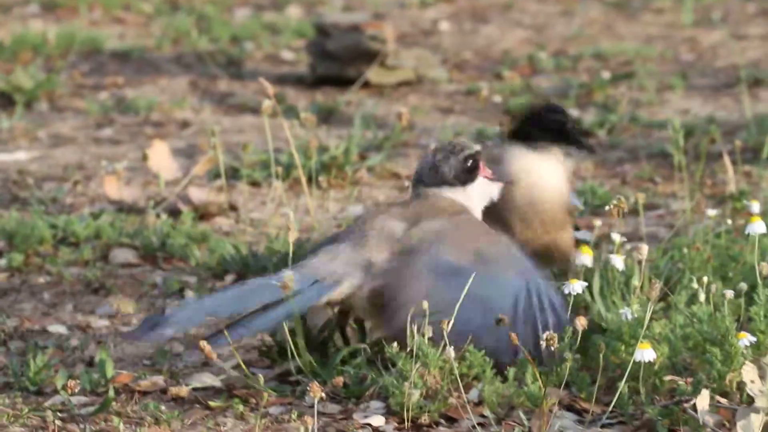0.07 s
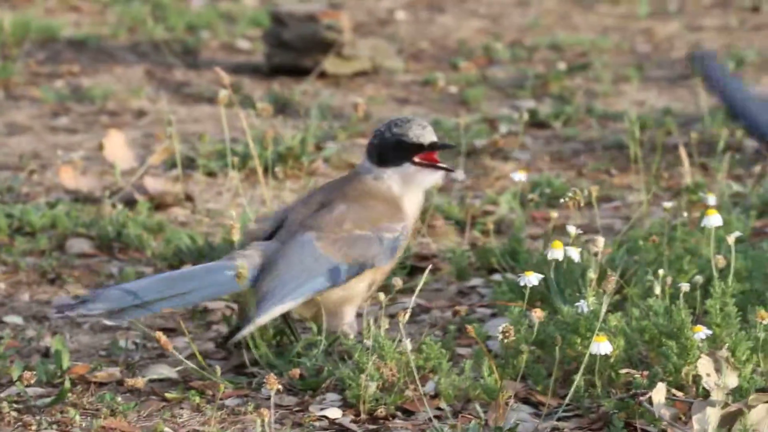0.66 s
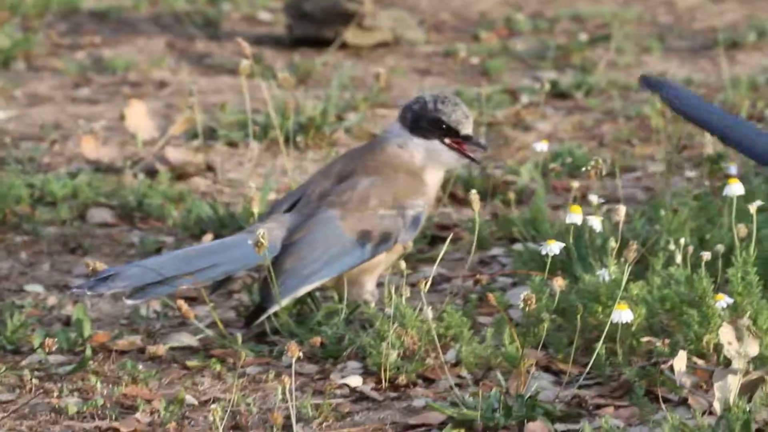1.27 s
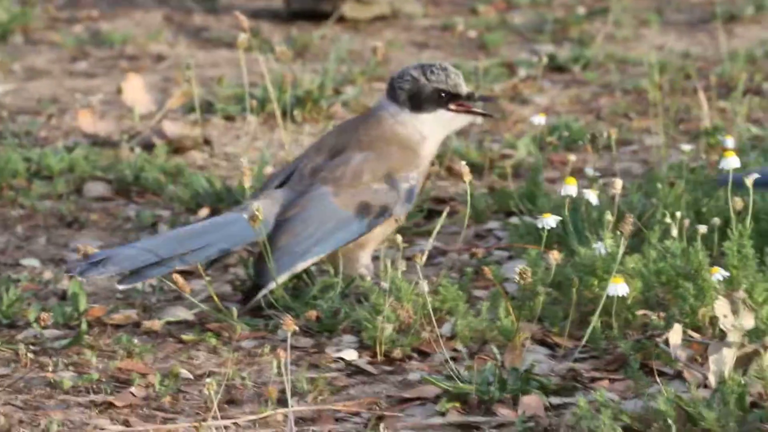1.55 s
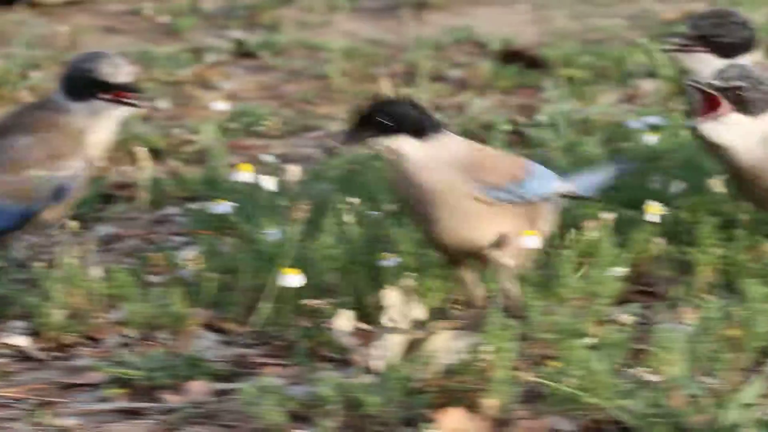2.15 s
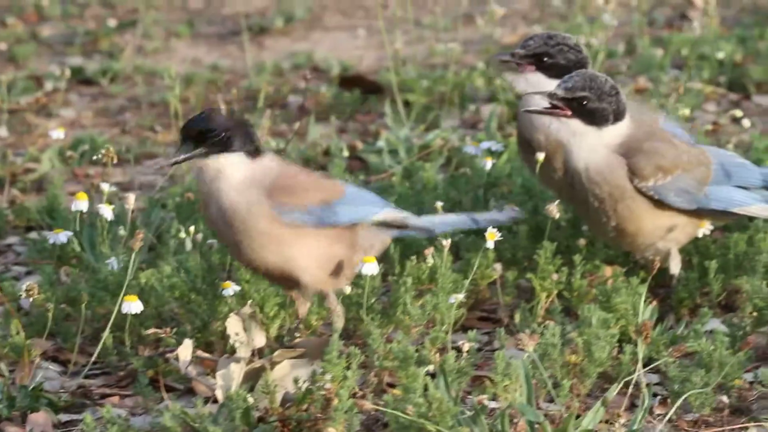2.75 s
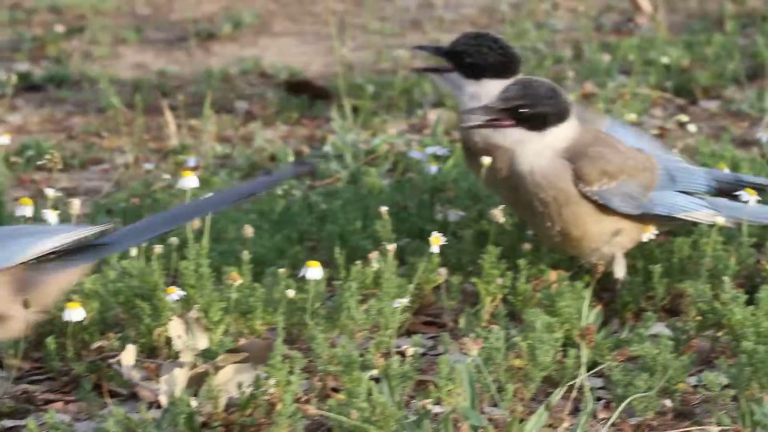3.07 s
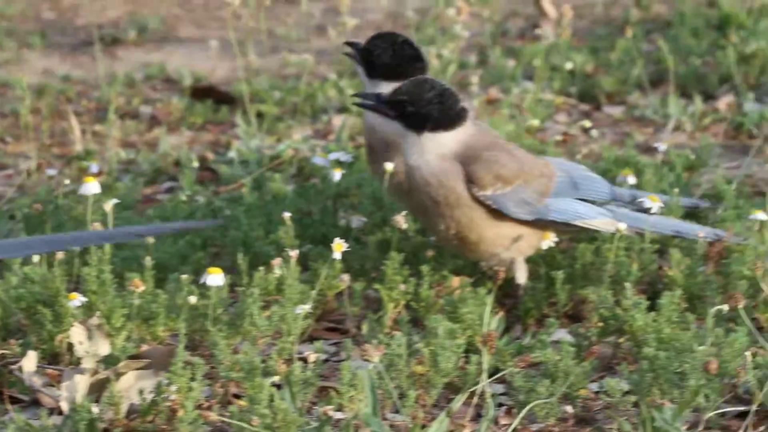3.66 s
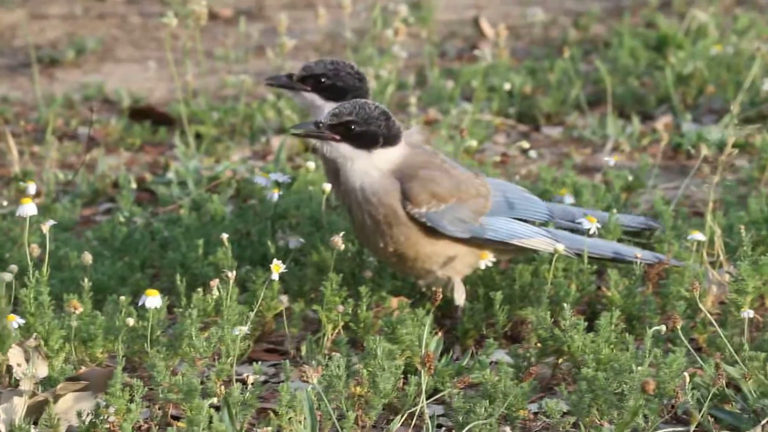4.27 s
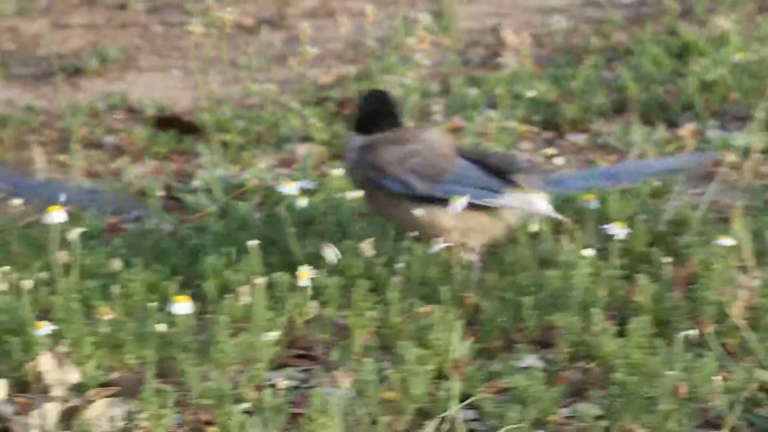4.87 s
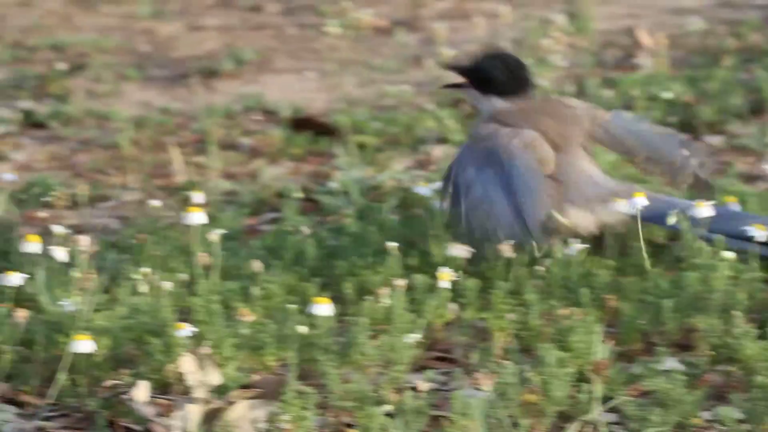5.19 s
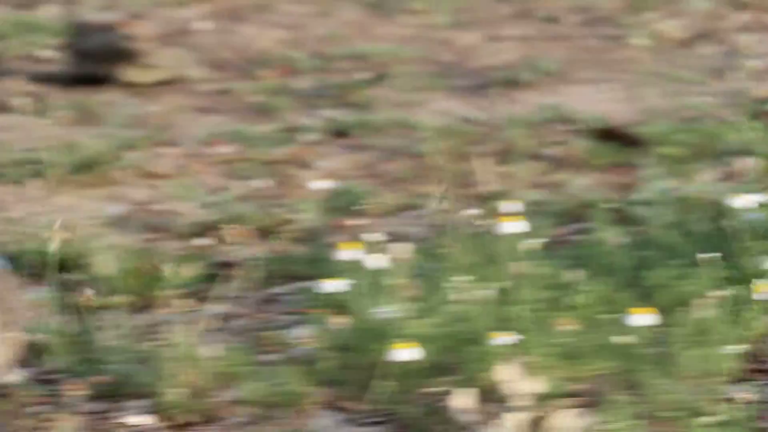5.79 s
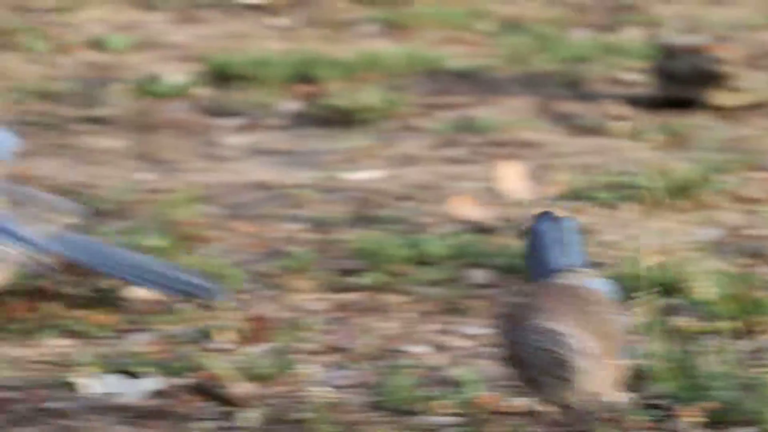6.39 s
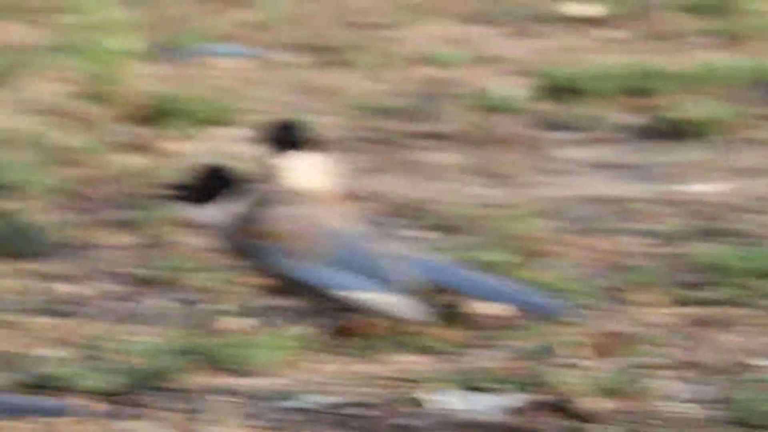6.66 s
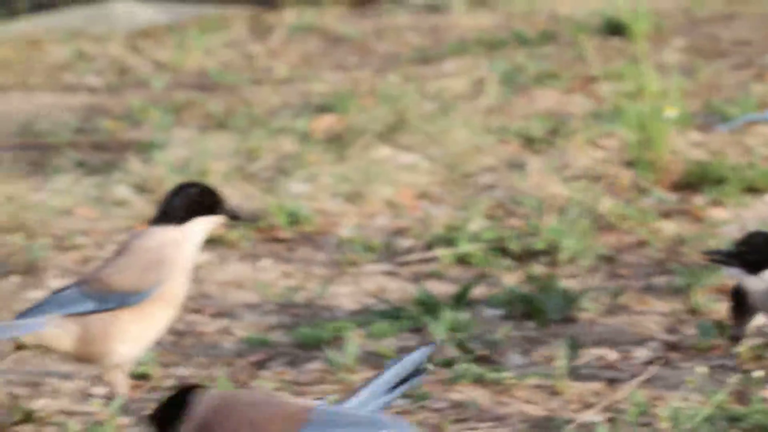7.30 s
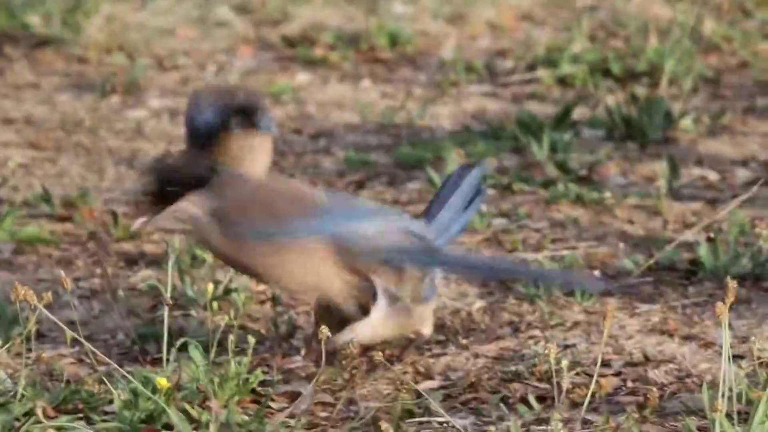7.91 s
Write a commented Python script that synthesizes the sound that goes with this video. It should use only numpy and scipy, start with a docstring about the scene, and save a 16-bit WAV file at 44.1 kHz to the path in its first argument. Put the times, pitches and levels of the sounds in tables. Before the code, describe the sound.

Outdoors among trees, a nearby flock of magpies opens with a run of rasping screeches and one rattling call. Bills click and feet rustle through dry grass as the cries grow more spaced out, with soft wingbeats and swishing feathers between them. Toward the end the screeching stops, far birds whistle, and two brief churrs sound close by. A quiet hush of air lies under everything.

```python
"""Azure-winged magpies squabble over food on dry grass, heard close by, outdoors and in mono.
They screech from the start, using both sides of the voice box at once; one gives a rattling churr.
Bills snap, and feet scuffle around 2 s. More screeches follow, then wings thump from 3.4 s and a far
bird whistles near 4 s. The last screeches come between 5 and 6.6 s. After 7 s, far whistles, thin high
notes and two short churrs end the scene. All along, trees echo faintly over a soft hush of air."""
import sys
import numpy as np
from scipy import signal
from scipy.fft import rfft, irfft, next_fast_len
from scipy.io import wavfile
from scipy.ndimage import uniform_filter1d

SR = 44100
rng = np.random.default_rng(int(sys.argv[2]) if len(sys.argv) > 2 else 0)


def master(y):
    """Save y as 16-bit WAV."""
    cut = np.clip(np.atleast_2d(y).T, -1, 1)
    pcm = np.round(cut * 32767)  # scale
    wavfile.write(sys.argv[1], SR, pcm.astype(np.int16))


N = 354563
TIME = np.arange(N) / SR
RATTLE_HZ, CUTOFF_HZ = 88, 15900  # how fast a voice flutters; where the treble ends

# Each screech starts "locked": the voice box's lower side stays an octave under the upper side.
# At the "break" the two sides spring "free" to cleaner pitches of their own.
# (start [s], length [s], time to break [s], scoop time [s], pitch at break [Hz], climb [Hz/s],
#  free upper pitch [Hz], free lower pitch [Hz], level [dB], swell [dB], step at break [dB],
#  treble [dB, counted 1.5 times when locked and half when free], extra treble when free [dB],
#  throat ring [dB], boost above 10 kHz [dB], locked roughness [0-1], locked lower strength [0-1])
SCREECHES = [ (-.005, 0.22, 0.099, 0.029, 3934, 625, 3630, 2202, -13.5, 6, -2.5, -4, -1, -4, 2, 0.33, 0.57),
             (0.466, .217, .134, 0.021, 3114, 6021, 3140, 2143, -14.5, 15, -2, -4, -3, 3, 3.5, 0.56, 0.7),
             (0.803, 0.17, .108, 0.023, 2945, 5400, 3074, 2160, -14.5, 6.5, 1, -4.5, -2.5, 0, 11.5, 0.66, .9),
             (1.087, 0.24, 0.14, 0.052, 3417, 2, 3454, 2092, -20, -1, 3.5, -1, -7.5, -2.5, -2, 0.42, 0.47),
             (1.51, .235, .115, 0.015, 3118, 5106, 3215, 2083, -16, 6, -5, -3.5, -3, 1.5, 6, 0.35, 0.6),
             (1.541, .213, .129, .018, 3806, 11388, 3740, 2096, -17, 1, -1.5, -4.5, -1, 7, 13.5, 0.42, 0.65),
             (2.736, 0.32, 0.3, 0.023, 2968, 599.5, 3000, 1500, -27, 0.5, 0, -4.5, -10, -4.5, 2, 0.5, 0.2),
             (2.8, 0.19, 0.11, 0.019, 3068, 6102, 3166, 2117, -15.5, -2, 2, -7, -5.5, 6.5, 12, 0.71, 0.7),
             (3.533, 0.27, .165, 0.019, 3025, 3000, 3518, 2215, -17.5, 7.5, -0.5, 0, 1.5, -9.5, 12.5, 0.6, 0.4),
             (5.007, 0.2, .095, 0.017, 3227, 8292, 3088, 2122, -14, 8.5, -1.5, -9, -4, 0.5, 12, 0.63, 0.44),
             (5.495, 0.2, 0.11, 0.027, 3133, 7806.5, 3477, 2133, -20, 9.5, 5.5, 1, -2.5, -1.5, 5, 0.39, 0.22),
             (6.218, 0.23, 0.13, 0.034, 3010, 3004, 3024, 1983, -20.5, 10.5, 4.5, -0.5, -4, -4.5, 4, 0.5, 0.33),
             (6.372, 0.17, 0.1, 0.017, 2838, 6289, 2970, 1955, -16.5, 5, 2, -8.5, -5, 0, 12, 0.8, 0.67)]
def screech(start, length, break_s, scoop_s, pitch_hz, climb, upper_hz, lower_hz, level_db, swell_db,
            step_db, treble_db, free_treble_db, ring_db, edge_db, roughness, locked_strength):
    """A rasping cry scoops up, climbs, breaks into two pitches and falls as the breath runs out."""
    at, age, left = note(start, length)
    freed = ease(age - break_s, 0.01)  # 0 while locked, 1 when free
    scoop = 1 - .42 * np.exp(-age / scoop_s)
    fall = 1 - .37 * np.exp(-left / 0.018)
    locked_hz = (pitch_hz + climb * np.minimum(age - break_s, 0)) * scoop
    upper = (locked_hz * (1 - freed) + upper_hz * freed) * fall
    lower = (locked_hz / 2 * (1 - freed) + lower_hz * freed) * fall
    rough = np.clip(roughness * (1 - freed) + .15 * freed, 0, 1)
    # a weak lower side comes in late
    joined = np.clip(locked_strength, .01, 1) ** (0.63 * break_s / (age + 1e-3))
    voice = voice_box(upper, lower, freed, rough, joined * (1 - freed) + freed, ring_db, edge_db)
    low = signal.sosfiltfilt(signal.butter(6, 6000, fs=SR, output="sos"), voice)
    # the open bill lets the treble out
    bill_open = ease(age, 0.021) * ease(left, 0.01)
    treble_gain = from_db(treble_db * (1.5 - freed) + free_treble_db * freed) * bill_open
    voice = even_out(low, size=450) + treble_gain * even_out(voice - low, size=450)
    held_back_db = swell_db * np.maximum(1 - age / (.85 * break_s), 0)
    strain_db = 1.7 * rough * wander(len(at), 40)
    gain = from_db(level_db + step_db * freed - held_back_db + strain_db)
    out = np.zeros(N)
    out[at] = gain * ease(age, 0.0078) * ease(left, .024) * voice
    return out


# How the windpipe and bill favour some pitches over others: (frequency [Hz], gain [dB])
THROAT = [(530, -68.5), (900, -28.5), (1680, -34), (1970, -23.5), (2300, -26), (2890, -10.5), (3380, -5.5),
          (4100, 4.5), (4460, 0), (5550, -7.5), (6030, -6.5), (7580, -1), (9530, -6), (13000, -11),
          (16000, -32.5)]
def voice_box(upper, lower, freed, rough, lower_strength, ring_db, edge_db,
              ring_hz=4160, ring_octaves=0.39):
    """Two linked membranes shake in the breath, making overtones and tones at sums of their pitches."""
    size = len(upper)
    throat = []
    for hz, db in THROAT:
        ring = np.exp(-(np.log2(hz / ring_hz) / ring_octaves) ** 2)
        throat.append((hz, db + edge_db * (hz > 10000) + ring_db * ring))
    shake = rattle(size, unevenness=.35)
    bend = 1 + 0.021 * rough * shake + 0.0033 * wander(size, 120.3) + 0.00412 * wander(size, 25)
    upper_phase = phase_of(upper * bend * (1 + .035 * rough * wander(size, 900)))
    lower_phase = phase_of(lower * bend * (1 + .035 * rough * wander(size, 900)))
    # once free, the lower side grows a tone one octave above itself
    octave_strength = lower_strength * np.clip(2 * freed, .1, 1) * from_db(-4)
    tone = np.zeros(size)
    for n, strength in enumerate([1, lower_strength, octave_strength]):
        for m in range(0 if n else 1, 8):
            hz = m * upper + n * lower
            gain = strength * gain_at(throat, hz) * (hz < CUTOFF_HZ)
            drift = from_db(-9.5 * (m > 1) + 3 * wander(size, 24.63))  # upper overtones are weaker
            shimmer = 1 + 0.64 * rough * wander(size, 200)
            tone += gain * drift * shimmer * np.cos(m * upper_phase + n * lower_phase)
    # disorderly shaking adds rasp between the tones, but the membranes can only swing so far
    rasp = colour(rng.standard_normal(size) * (1 + np.cos(upper_phase)), throat)
    voice = even_out(even_out(tone, size=500) + (0.036 + rough ** 1.31) * rasp, size=36)
    return voice * (1 + 0.13 * rough * shake)


# Rattling notes that rise and fall: (start [s], length [s], top pitch [Hz], droop at the ends [0-1],
#  level [dB], rasp [dB], first overtone [dB], low knock [dB], pitch shake [0-1])
CHURRS = [(0.483, 0.39, 2674, 0.04, -25, -1.5, -14.5, -30, 0.01),
          (7.648, 0.15, 2566, 0.23, -24.5, -6.5, -18.5, -14, 0.05),
          (7.785, .127, 2417, .18, -29.5, -7.5, -21, -12, 0.06)]
def churr(start, length, top_hz, droop, level_db, rasp_db, overtone_db, knock_db, bend):
    """One side of the voice box throbs alone; between beats the pitch sags and a lower tone knocks."""
    at, age, left = note(start, length)
    shake = rattle(len(at), unevenness=0.14)
    beats = unit_power(1 + 0.24 * np.tanh(2 * shake))
    arch = 1 - droop * (2 * age / length - 1) ** 2
    scoop = 1 - .17 * np.exp(-age / 0.00853)
    quiver = 1 + bend * (shake + 0.92 * wander(len(at), 900))
    phase = phase_of(top_hz * arch * scoop * quiver)
    overtones = sum(from_db(overtone_db - 6 * k) * np.sin((k + 2) * phase) for k in range(4))
    tone = unit_power(np.sin(phase) + overtones)
    knock = from_db(knock_db) * np.maximum(-shake, 0) ** 4 * np.sin(phase / 2)
    rasp = colour(rng.standard_normal(len(at)), [(1000, -18.5), (1700, -17.5), (2600, 12), (4200, 17),
                                                 (5600, -11), (7200, 4), (9000, 0.5), (15000, -7)])
    voice = beats * (tone + from_db(rasp_db) * (1 + 0.27 * shake) * rasp) + knock
    out = np.zeros(N)
    out[at] = from_db(level_db) * ease(age, 0.013) * ease(left, 0.042) * voice
    return out


# Snaps and pecks: (time [s], relative peak level [dB], ringing pitch [Hz])
SNAPS = [(.456, -30, 3870), (1.08, -17, 3670), (1.501, -22, 3900), (1.809, -22, 4330), (1.848, -26.5, 4400),
         (1.943, -28.5, 1680), (1.995, -23, 1460), (2.636, -26, 11200), (2.745, -13, 3980),
         (3.081, -24, 12700), (3.359, -31.5, 12500), (4.403, -11.5, 1340), (4.464, -24, 1326),
         (4.655, -26, 1610), (4.833, -23, 2900), (5.383, -34.5, 4000), (5.443, -24.5, 1460),
         (6.026, -36, 1200), (6.758, -35, 3590), (7.303, -32, 1270)]
def bill_snaps(gain_db=-4, decay_s=0.002, ring_width_hz=400):
    """Each snap is a tiny crack that makes the bill ring for a moment."""
    out, age = np.zeros(N), TIME[:1500]
    fade = np.exp(-age / decay_s)
    radius = np.exp(-np.pi * ring_width_hz / SR)  # nearer to 1 rings longer
    for time, db, hz in SNAPS:
        crack = colour(rng.standard_normal(len(age)), CRACKLE) * fade
        feedback = [1, -2 * radius * np.cos(2 * np.pi * hz / SR), radius ** 2]
        ring = signal.lfilter([1, 0, -1], feedback, rng.standard_normal(len(age)) * fade)
        snap = unit_power(ring) + 0.3 * unit_power(crack)
        start = int(time * SR)
        out[start:start + len(age)] += from_db(db + gain_db) * snap / abs(snap).max()
    return out


# Wing thumps: (time [s], middle pitch [Hz], half length [s], level [dB])
WINGBEATS = [(3.396, 400, 0.0046, -33.5), (3.842, 184.2, 0.0049, -25), (4.055, 354.3, 0.0025, -23),
             (4.218, 314, 0.0039, -27), (4.672, 311.7, 0.0067, -22.5), (4.956, 277, 0.0018, -23.5),
             (5.721, 223.6, 0.0063, -27)]
def wingbeats(swish_db=-13):
    """Each stroke pushes out a short puff of air, falling in pitch, with a swish of feathers."""
    out, feathers = np.zeros(N), colour(rng.standard_normal(N), BRUSH)
    for time, hz, half_length, db in WINGBEATS:
        at = np.flatnonzero(abs(TIME - time) < .06)
        stroke = (TIME[at] - time) / half_length
        puff = np.exp(-stroke ** 2) * np.sin(phase_of(hz * (1 - 0.4 * np.tanh(stroke))))
        swish = from_db(swish_db) * feathers[at] * np.exp(-(stroke / 0.71) ** 2)
        out[at] += from_db(db) * (puff + swish)
    return out


# Feathers sweeping past: (time [s], strongest frequency [Hz], half length [s], level [dB])
SWEEPS = [(0.017, 620, 0.0088, -31.5), (3.915, 870, 0.068, -46), (5.11, 1100, 0.016, -29.5),
          (5.213, 980, 0.054, -37.5)]
def feather_sweeps():
    """A wing or tail swings by with a rush of air that swells and fades."""
    out = np.zeros(N)
    for time, hz, half_length, db in SWEEPS:
        at = np.flatnonzero(abs(TIME - time) < .15)
        band = [(hz / 2, -12), (hz, 0), (2 * hz, -12), (10 * hz, -40)]
        swish = colour(rng.standard_normal(len(at)), band)
        out[at] += from_db(db) * swish * np.exp(-((TIME[at] - time) / half_length) ** 2)
    return out


# The soft sound of brushed grass or feathers: (frequency [Hz], relative level [dB])
BRUSH = [(70, -11), (280, -1.5), (700, -5), (1500, -8), (3000, -14.5), (7000, -28)]
# The crisp sound of crushed dry leaves or a cracking bill: (frequency [Hz], relative level [dB])
CRACKLE = [(1200, -16), (3000, 0), (7000, -4.5), (11500, -0.5), (16000, -8)]
# Scuffles that swell and fade: (middle time [s], half length [s], brushing [dB], crackle [dB])
SCUFFLES = [(0.033, 0.092, -47, -30), (2.082, 0.071, -43.5, -45), (2.264, 0.29, -43.5, -45.5),
            (3.223, 0.053, -43.5, -38.5), (3.39, 0.17, -46.5, -55), (3.943, 0.23, -45.5, -58),
            (4.42, 0.29, -47.5, -57), (4.89, 0.056, -42, -48), (5.175, 0.47, -44.5, -52),
            (5.64, 0.38, -49.5, -61)]
def grass(breaks_per_s=300, stir_brush_db=-59.5, stir_crackle_db=-65.5, decay_s=0.0012):
    """Feet and tails brush the grass and break dry stalks; between scuffles the flock stirs softly."""
    brush_power, crackle_power = from_db(stir_brush_db) ** 2, from_db(stir_crackle_db) ** 2
    for time, half_length, brush_db, crackle_db in SCUFFLES:
        swell = 1 / (1 + ((TIME - time) / half_length) ** 2 / 2) ** 4
        brush_power += swell * from_db(brush_db) ** 2
        crackle_power += swell * from_db(crackle_db) ** 2
    breaking = rng.random(N) < breaks_per_s * from_db(4 * wander(N, 15)) / SR  # in clumps
    breaks = breaking * from_db(7 * np.minimum(rng.exponential(1, N), 2))
    fades = signal.lfilter([1], [1, -np.exp(-1 / (decay_s * SR))], breaks + 1e-18)
    ticks = unit_power(fades * rng.standard_normal(N))
    brush = colour(rng.standard_normal(N) + 0.42 * ticks, BRUSH) * from_db(3.1 * wander(N, 15))
    crackle = colour(ticks + rng.standard_normal(N), CRACKLE)
    return brush * np.sqrt(brush_power) + crackle * np.sqrt(crackle_power)


# Far whistles, one list of points for each: (time [s], pitch [Hz], level [dB])
WHISTLES = [
    [(3.92, 2630, -56), (4.01, 3200, -59), (4.18, 3040, -52), (4.23, 2940, -60)],
    [(7.12, 2330, -72), (7.3, 2430, -65), (7.45, 2400, -68)],
    [(7.47, 2290, -55), (7.56, 3160, -49.5), (7.61, 3215, -47), (7.66, 3270, -36)],
]
# A small bird's thin, high notes, one list for each: (time [s], pitch [Hz], level [dB])
THIN_NOTES = [
    [(7.3, 7940, -64), (7.37, 8040, -54), (7.41, 7700, -63), (7.56, 7480, -61)],
    [(7.78, 7770, -78), (7.93, 7570, -54.5), (8.04, 7540, -59)],
]
def whistle(points, quiver, fade_s=0.0059):
    """A far bird glides through a nearly pure note with a quiver in its pitch."""
    times, pitches, levels = np.transpose(points)
    at = np.flatnonzero((TIME >= times[0]) & (TIME <= times[-1]))
    now = TIME[at]
    fade = np.clip(np.minimum(now - times[0], times[-1] - now) / fade_s, 0, 1)
    level_db = np.interp(now, times, levels) + 2.3 * wander(len(at), 29)
    hz = np.interp(now, times, pitches) * (1 + quiver * wander(len(at), 340))
    out = np.zeros(N)
    out[at] = fade * from_db(level_db) * unit_power(np.sin(phase_of(hz)))
    return out


def trees(sound, tail_db, near_s=0.24, far_s=0.58, echo_s=0.047, echo_db=-24):
    """Trunks scatter the sound into a short tail with one clear echo; farther trees linger faintly."""
    age = TIME[:SR]
    decay = from_db(-60 * age / near_s) + from_db(-15) * from_db(-60 * age / far_s)
    spectrum = [(500, -4), (4600, -5), (5300, 0), (6200, -5), (9000, -2), (16000, -10)]
    tail = colour(rng.standard_normal(SR), spectrum) * decay * np.minimum(age / 0.0073, 1)
    tail *= from_db(tail_db) / np.sqrt(np.sum(tail ** 2))
    tail[int(echo_s * SR)] += from_db(echo_db)
    return sound + signal.fftconvolve(sound, tail)[:N]


# The hush of still outdoor air: (frequency [Hz], relative level [dB])
AIR = [(18, -54.5), (30, -24), (98, -6.5), (153, -7.5), (194, -9.5), (328, -11), (512, -6), (801, -18.5),
       (889, -30.5), (4780, -21.5), (6050, -28.5), (16000, -45)]
def air(level_db=-53):
    """A soft, steady, mostly low noise lies under everything."""
    return from_db(level_db) * colour(rng.standard_normal(N), AIR)


def from_db(db):
    """Turn decibels into a number to multiply by."""
    return 10 ** (np.asarray(db) / 20)


def unit_power(x):
    """Scale a sound so that its average power is 1."""
    return x / np.sqrt(np.mean(x ** 2) + 1e-20)


def even_out(x, size):
    """Hold the power near 1 over a sliding window of `size` samples."""
    power = uniform_filter1d(uniform_filter1d(x ** 2, size=size), size=size)
    return x / np.sqrt(np.abs(power) + 1e-5)


def gain_at(points, hz):
    """Read the gain at any frequency from (frequency [Hz], level [dB]) points."""
    frequencies, db = np.transpose(points)
    return from_db(np.interp(np.log(np.maximum(hz, 1)), np.log(frequencies), db))


def colour(x, points):
    """Shape a sound's lows and highs, fading out below the first point; the result has power 1."""
    size = next_fast_len(len(x))
    hz = np.arange(size // 2 + 1) * SR / size
    bass_cut = np.minimum(hz / points[0][0], 1) ** 2
    return unit_power(irfft(rfft(x, size) * gain_at(points, hz) * bass_cut, size)[:len(x)])


def wander(size, rate_hz):
    """A random drift up and down, typically about 1 away from zero."""
    knots = rng.standard_normal(int(size * 2 * rate_hz / SR) + 2)
    return unit_power(np.interp(np.arange(size) * 2 * rate_hz / SR, np.arange(len(knots)), knots))


def phase_of(hz):
    """How far a vibration has turned so far, in radians."""
    return 2 * np.pi * np.cumsum(hz) / SR


def rattle(size, unevenness):
    """The uneven flutter of the voice's membranes, between -1 and 1."""
    return np.sin(phase_of(RATTLE_HZ * (1 + unevenness * wander(size, RATTLE_HZ / 2))))


def note(start, length):
    """The samples of a note, the time since its start and the time left."""
    at = np.flatnonzero((TIME >= start) & (TIME < start + length))
    return at, TIME[at] - start, start + length - TIME[at]


def ease(age, rise_s):
    """Rise from 0 towards 1 once the age is positive."""
    return 1 - np.exp(-np.maximum(age, 0) / rise_s)


def scene():
    """Near birds, far birds, grass and air, the same in both channels."""
    calls = sum(screech(*row) for row in SCREECHES) + sum(churr(*row) for row in CHURRS)
    near = calls + wingbeats() + feather_sweeps() + bill_snaps()
    far = sum(whistle(points, quiver=0.017) for points in WHISTLES)
    far += sum(whistle(points, quiver=0.022) for points in THIN_NOTES)
    mono = air() + trees(near, tail_db=-16) + trees(far, tail_db=-6.5) + grass()
    return np.array([mono, mono])


def record(dry):
    """Cut off the very highest treble steeply."""
    return signal.sosfilt(signal.ellip(10, .1, 80, CUTOFF_HZ, fs=SR, output="sos"), dry)


dry = scene()
out = record(dry)
master(out)
```